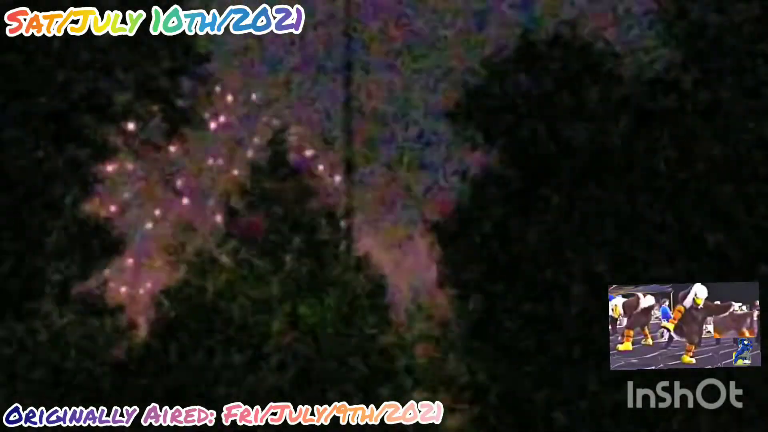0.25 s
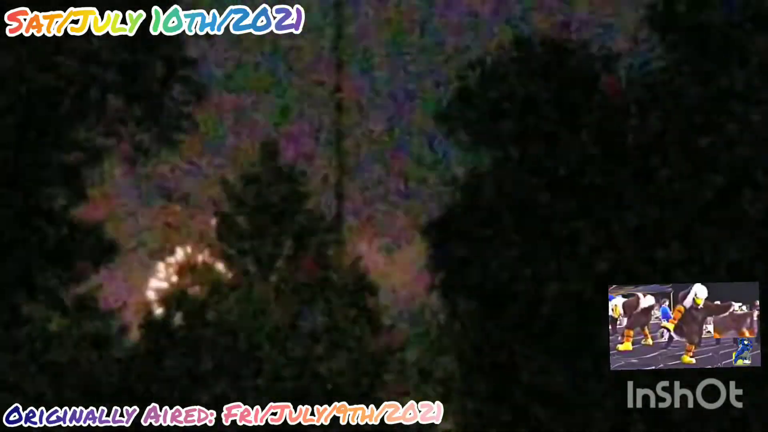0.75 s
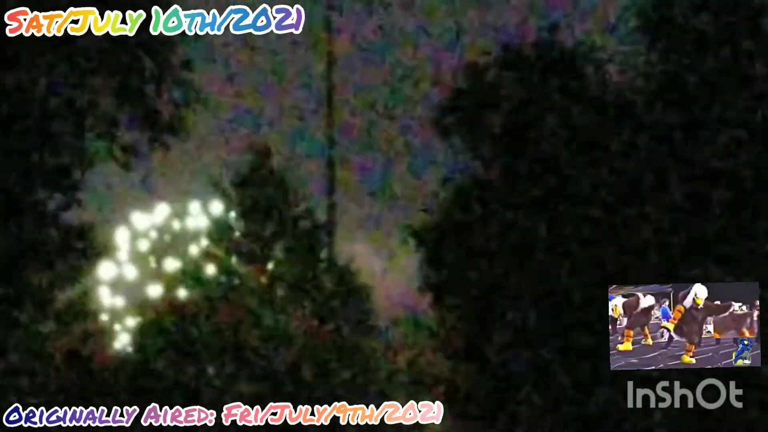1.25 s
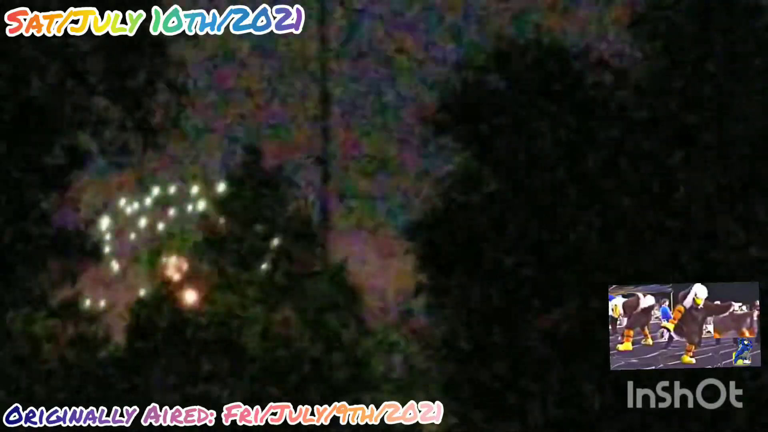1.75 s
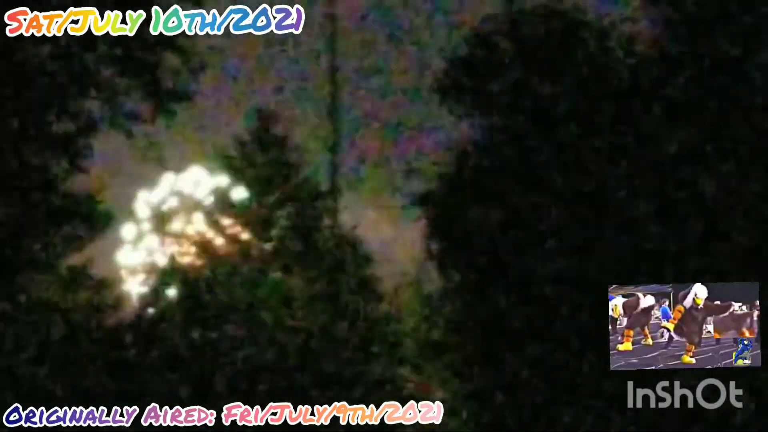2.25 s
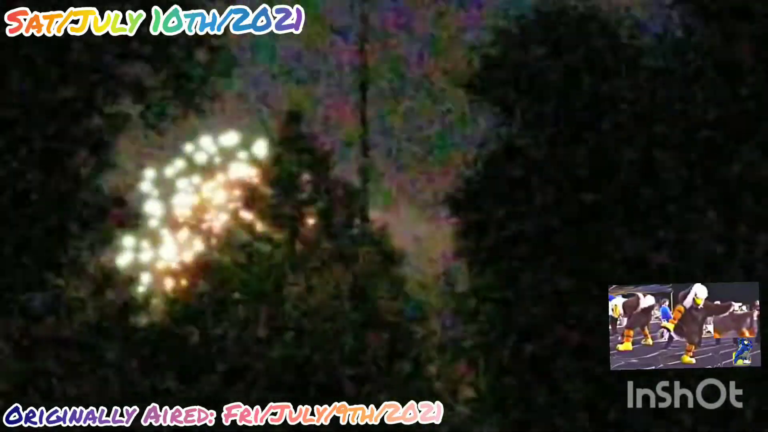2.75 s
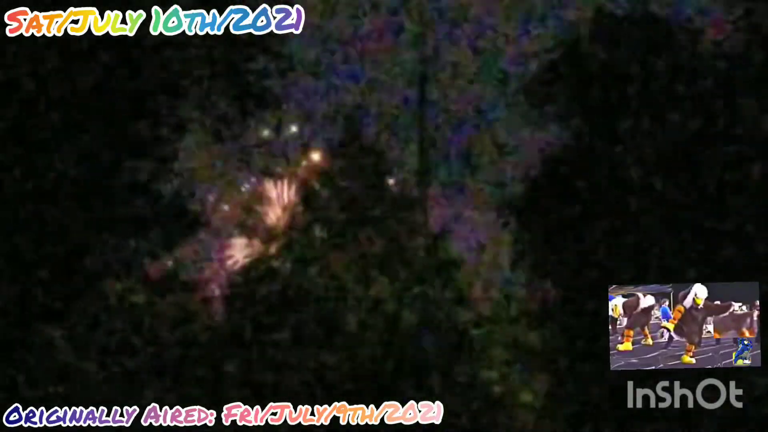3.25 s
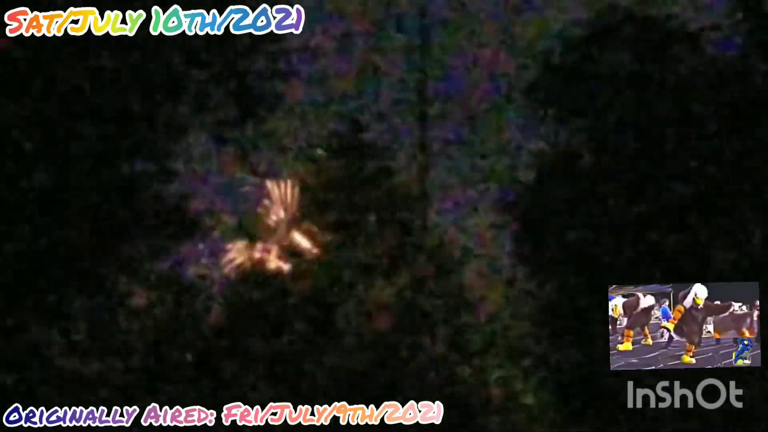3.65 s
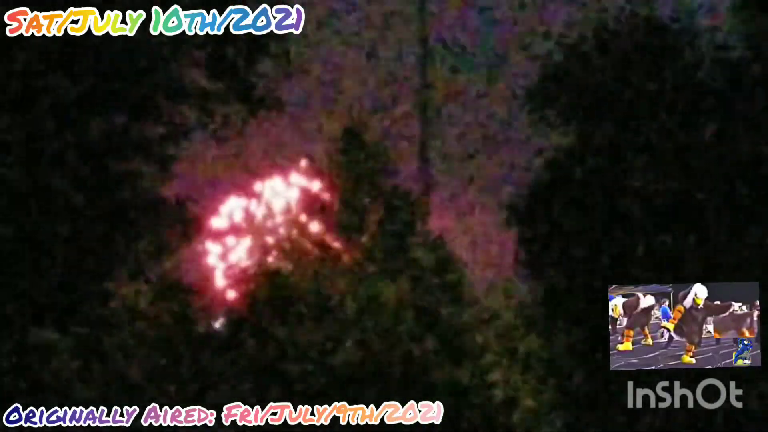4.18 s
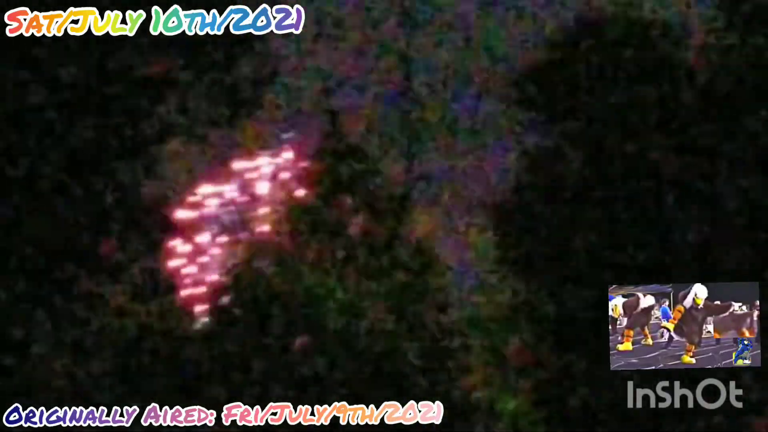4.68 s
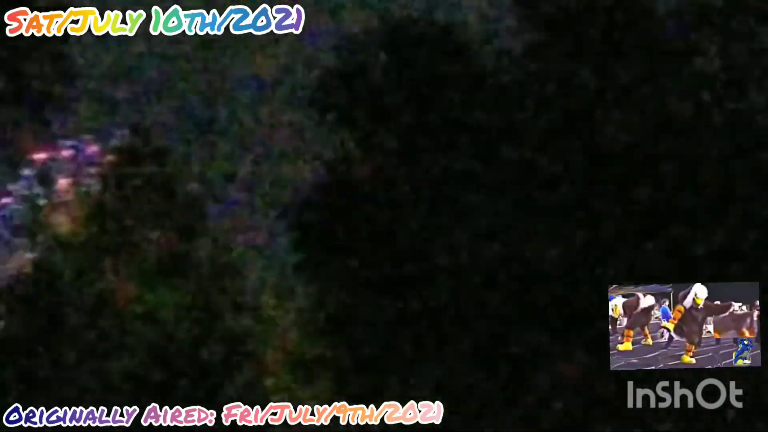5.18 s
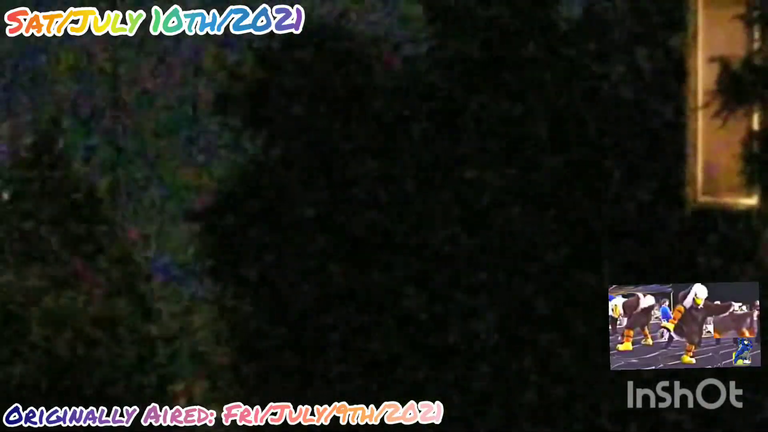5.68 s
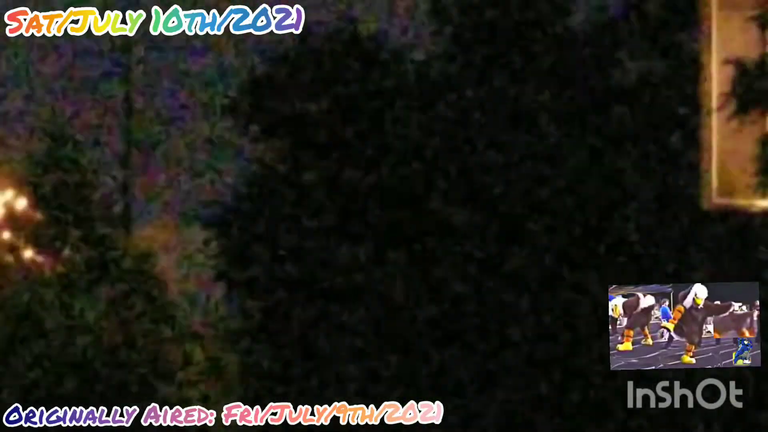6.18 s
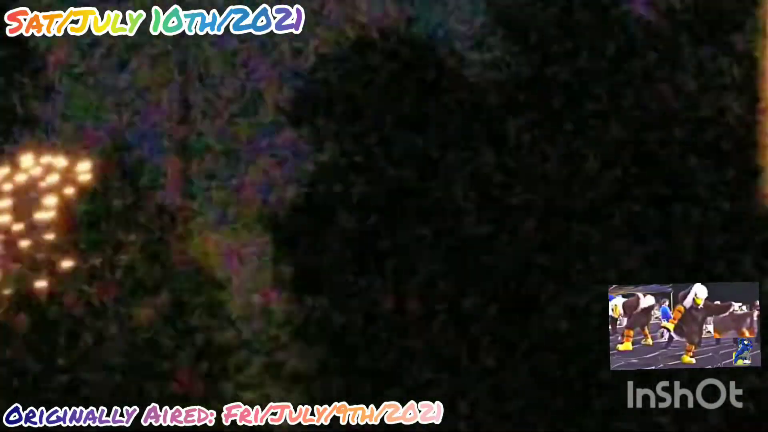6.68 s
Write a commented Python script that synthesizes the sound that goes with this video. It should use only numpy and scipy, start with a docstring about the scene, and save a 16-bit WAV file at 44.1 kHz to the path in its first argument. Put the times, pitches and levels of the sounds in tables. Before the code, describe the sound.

Distant fireworks thud dully in irregular clusters, each with a faint crack and rolling echo, over a far engine hum and soft hiss.

```python
"""Fireworks burst far away, heard from a garden beside a house: dull damped thumps with a faint crack on the
front. Each arrives three times within 20 ms (direct, then two echoes); single and diffuse echoes roll away. A
distant engine, built from wavering sines, hums up and coasts down, then whines in overtones. Filtered noise
makes the fading rumble and faint wash of the town and the hiss of the microphones."""
import sys
import numpy as np
from scipy import signal
from scipy.fft import rfft, irfft
from scipy.io import wavfile

SR = 44100
rng = np.random.default_rng(int(sys.argv[2]) if len(sys.argv) > 2 else 0)


def master(y):
    """Save y as 16-bit WAV."""
    cut = np.clip(np.atleast_2d(y).T, -1, 1)
    pcm = np.round(cut * 32767)  # scale
    wavfile.write(sys.argv[1], SR, pcm.astype(np.int16))


N = 305613
TIME = np.arange(N) / SR


def from_db(db):
    """Decibels to gain."""
    return 10 ** (np.asarray(db) / 20)


def rms_one(x):
    """Scale to rms 1."""
    return x / np.sqrt(np.mean(x ** 2) + 1e-20)


def in_time(rows):
    """Each column of a curve at every sample, linear between rows."""
    s, *columns = np.transpose(rows)
    return [np.interp(TIME, s, c) for c in columns]


def at_hz(points, hz):
    """Read a spectrum on a log-frequency axis."""
    f, value = np.transpose(points)
    return np.interp(np.log(hz + 1), np.log(f), value)


def butter(x, hz, kind, order):
    """Causal low- or high-pass."""
    return signal.sosfilt(signal.butter(order, min(hz, .45 * SR), kind, fs=SR, output="sos"), x)


def colour(x, spectrum):
    """Causal filter with the given spectrum: folding the cepstrum makes it minimum-phase."""
    size = 8192
    hz = np.fft.rfftfreq(size, 1 / SR)
    cepstrum = irfft(np.log(from_db(at_hz(spectrum, hz))))
    cepstrum[1:size // 2] *= 2
    cepstrum[size // 2 + 1:] = 0
    response = irfft(np.exp(rfft(cepstrum)))
    return signal.fftconvolve(x, response[None], axes=1)[:, :x.shape[1]]


def drift(rate_hz):
    """Slow chance: random knots of spread 1, joined by straight lines."""
    knots = rng.standard_normal(int(N / SR * rate_hz) + 2)
    return np.interp(TIME * rate_hz, np.arange(len(knots)), knots)


def diffuse(spectrum, size):
    """Stereo noise from all around: alike in the bass, opposed near 1 kHz, unrelated in the treble."""
    # left-right correlation of diffuse sound: f/Hz, correlation/-1..1
    likeness = [(30, 1), (125, 0.93), (250, 0.87), (500, .5), (1000, -0.74), (2000, 0.018), (4000, 0.),
                (16000, -0.063)]
    hz = np.fft.rfftfreq(size, 1 / SR)
    mid, side = rfft(rng.standard_normal((2, size)))
    alike = np.clip(at_hz(likeness, hz), -1, 1)
    both = np.sqrt(1 + alike) * mid + np.sqrt(1 - alike) * side * [[1], [-1]]
    return irfft(both * from_db(at_hz(spectrum, hz)), size)


def from_left(x, lag_s):
    """Sound from the left reaches the right microphone later and 1 dB weaker."""
    left, right = np.broadcast_to(x, (2, N))
    lagged = np.interp(TIME - lag_s, TIME, right)
    return np.array([left, lagged]) * from_db([[.5], [-.5]])


def add(track, sound, s):
    """Mix a sound in at a time."""
    start = int(np.clip(round(s * SR), 0, N - 1))
    track[..., start:start + sound.shape[-1]] += sound[..., :N - start]


def thump(hz, damping=0.6, front=0.98, low_cut_hz=48, reach=3.16):
    """Blast wave: push, suction and rebound, front rounded by distance, deepest part lost; peak 1."""
    turn = 2 * np.pi * hz * TIME[:SR // 6]
    wave = np.exp(-damping * turn) * (np.cos(turn) - damping * np.sin(turn))
    wave = butter(wave, front * hz, "low", order=1)
    wave = butter(wave, reach * hz, "low", order=6)  # bigger shells are duller
    wave = butter(wave, low_cut_hz, "high", order=4)
    return wave / np.abs(wave).max()


def crack(bright_db, scatter_db=-19, front_db=2.0, wide_db=-7, smear_s=.006):
    """Stereo shock front, frayed into a short spray by turbulence and trees, a little from the sides."""
    # shock front coloured by its long way through the air: f/Hz, relative level/dB
    air = [(150, -19.5), (280, -1), (370, 0.5), (480, 4), (600, 1), (850, -9.5), (1100, -7), (1450, -11.5),
           (1900, -26.5), (2600, -51), (7000, -62), (11000, -69)]
    tilt_low_hz, tilt_high_hz = 300, 1900  # bright_db is dB per octave between these
    t = TIME[:SR // 14]
    ahead, sides = rng.standard_normal((2, len(t)))
    spray = ahead + from_db(wide_db) * sides * [[1], [-1]]
    spray = from_db(scatter_db) * spray * np.exp(-t / smear_s)
    middle_hz = np.sqrt(tilt_low_hz * tilt_high_hz)
    tilted = []
    for hz, db in air:
        octaves = np.log2(np.clip(hz, tilt_low_hz, tilt_high_hz) / middle_hz)
        tilted.append((hz, db + bright_db * octaves))
    front = colour((t == 0)[None] * 1., tilted)
    frayed = from_db(front_db) * front + colour(spray, tilted)
    return frayed * (1 - t / t[-1]) / np.abs(front).max()


def bursts(rise_ms=1.84, cracks_db=5.5, crack_follows=0.93, second_dull_db=-2.5):
    """Thumps and cracks, each direct and twice echoed; the second echo weakens the crack further."""
    # shell bursts: t/s, thump level/dB, thump f/Hz, first echo delay/ms,
    # lean to first echo/dB, crack level before cracks_db/dB, crack brightness/(dB/octave)
    shells = [(0.336, -29, 123.3, 8.9, 4.5, -44, 1.5), (0.8729, -28, 110, 8.64, 2, -43, -0.5),
              (1.2585, -28.5, 120.3, 8.6, -3.5, -47.5, 0), (1.9778, -13, 82.5, 4.76, 0, -39, 0.5),
              (2.063, -16, 82.4, 6.2, -2, -38, 0), (2.1642, -15, 84, 3.65, -2.5, -40.5, -1.5),
              (2.2077, -21.5, 72.7, 6.25, -1.5, -45, 0.5), (2.8809, -18, 71.3, 8.77, 12, -39, 0),
              (3.2306, -20.5, 81.5, 6.1, -0.5, -44, 0), (3.5825, -19.5, 89.0, 5.33, -1.0, -44.5, -0.5),
              (4.751, -12.5, 66.6, 7.24, -6.5, -35.5, 1.5), (4.8293, -19.5, 69, 7.15, 7.5, -51.5, -0.5),
              (4.9807, -17.5, 62.2, 9.0, -1.5, -43, -1.5), (5.058, -14, 74.3, 7.0, -2.5, -43.5, 1),
              (5.2263, -23.5, 82.0, 7.37, 2.0, -51, -2), (6.1581, -14.5, 91, 4.16, -2, -43.5, 1),
              (6.1865, -13.5, 60.0, 8.3, 6.0, -48.5, 1.5), (6.442, -11, 68.5, 8.67, 5, -39.5, -1)]
    first_echo_db, second_wall_db = 1.0, 4  # at zero lean
    second_loses = .45  # share of the first echo's lean
    wall_gap_ms, gap_share = 4.1, .33  # second echo: fixed gap plus share of the first delay
    thumps, cracks = np.zeros(N), np.zeros((2, N))
    for s, thump_db, hz, echo_ms, lean_db, crack_db, bright_db in shells:
        body = from_db(thump_db) * thump(hz)
        direct = 0, 0, 0
        first = echo_ms, first_echo_db + lean_db, 0
        second_ms = echo_ms + wall_gap_ms + gap_share * echo_ms
        second = second_ms, second_wall_db - second_loses * lean_db, second_dull_db
        for delay_ms, echo_db, dull_db in (direct, first, second):
            # the thump starts rise_ms ahead of its crack
            add(thumps, from_db(echo_db) * body, s + (delay_ms - rise_ms) / 1000)
            arrival_db = crack_db + cracks_db + crack_follows * echo_db + dull_db
            add(cracks, from_db(arrival_db) * crack(bright_db), s + delay_ms / 1000)
    return thumps, cracks


def yard(x, boom_hz=68, width_hz=16, boom_db=-10.0):
    """The yard booms at one low pitch, and neighbouring houses answer with single echoes."""
    # house echoes: delay/s, level/dB
    houses = [(.05, -17), (.19, -23.5)]
    boom = signal.lfilter(*signal.iirpeak(boom_hz, boom_hz / width_hz, fs=SR), x)
    out = x + from_db(boom_db) * boom
    for delay_s, echo_db in houses:
        add(out, from_db(echo_db) * x, delay_s)
    return out


def neighbourhood(x, near_db=-50, near_t60_s=0.72, far_db=-58, far_t60_s=3.71, lumpy_db=4.0, gap_s=0.011):
    """Nearby houses scatter a quick echo; streets and woods farther off return a long uneven roll."""
    # colour of the rolling echoes: f/Hz, relative level/dB
    roll = [(30, -6), (50, 2.5), (70, 6), (100, -2), (160, -4), (280, 4.5), (500, 1.5), (1200, 0),
            (3000, -13)]
    size = 2 * SR
    t = TIME[:size]
    near = from_db(near_db - 60 * t / near_t60_s)
    far = from_db(far_db - 60 * t / far_t60_s)
    clumps = rms_one(from_db(lumpy_db * drift(70)[:size]))  # uneven returns from houses and groves
    onset = np.clip(t / gap_s - 1, 0, 1)
    response = diffuse(roll, size) * np.hypot(near, far) * clumps * onset
    return signal.fftconvolve(x[None], response, axes=1)[:, :N]


def engine_tone(start_s, end_s, hz, multiple, level_db, flutter_db, waver=0.0025, fade_s=0.085):
    """One order of the far engine, fluttering in level and pitch with the air on its way."""
    inside = np.clip(np.minimum(TIME - start_s + fade_s, end_s - TIME) / fade_s, 0, 1)
    phase = 2 * np.pi * multiple * np.cumsum(hz * (1 + waver * drift(45))) / SR
    level = from_db(level_db + flutter_db * drift(22))
    return np.sqrt(2) * inside * level * np.sin(phase)


def engine(whine_db=-2.5):
    """A low exhaust hum climbs under load and coasts down; the next pull carries only as overtones."""
    # climb: t/s, firing f/Hz, level/dB
    climb = [(0.05, 143.2, -39.5), (0.318, 145.7, -40), (0.38, 148.4, -41.5), (0.896, 152.6, -38),
             (1.404, 166.1, -39.5), (1.75, 169.0, -43)]
    # second pull: t/s, firing f/Hz, mean overtone level before whine_db/dB, brightness/(dB/order)
    pull = [(2.35, 162, -70.5, -2), (3.099, 162.1, -67.5, -0.5), (3.55, 165.6, -62, 1.5),
            (3.921, 170, -65.5, 0.5), (4.28, 160.9, -62.5, -7), (4.449, 162, -69, 3)]
    # multiples of the firing f
    overtones = (3, 4, 5)
    sag_hz_per_s, coast_fade_db_per_s, coast_end_s = 45, 4.5, 2.85
    hz, level_db = in_time(climb)
    coasting_s = np.maximum(TIME - climb[-1][0], 0)
    hz = hz - sag_hz_per_s * coasting_s
    level_db = level_db - coast_fade_db_per_s * coasting_s
    out = engine_tone(0, coast_end_s, hz, 1, level_db, flutter_db=1.7)
    hz, level_db, bright_db = in_time(pull)
    for multiple in overtones:
        overtone_db = level_db + whine_db + bright_db * (multiple - np.mean(overtones))
        out = out + engine_tone(pull[0][0], pull[-1][0], hz, multiple, overtone_db,
                                flutter_db=3.5, waver=0.00711)
    return out


def background(town_db=8.0, hiss_db=5.5, hiss_left_db=1.5):
    """Shaped noise: dying low rumble and wash of the town, and microphone hiss, stronger on the left."""
    # t/s, wash level before town_db/dB, hiss level before hiss_db/dB
    levels = [(0.0, -63, -77.5), (1.43, -60.5, -75), (3.59, -62, -79.5), (4.3, -64, -79), (6.93, -68, -80)]
    # rumble spectrum before rms scaling: f/Hz, density/(dB per Hz)
    rumble_spectrum = [(20, -43.5), (32, -26.5), (46, 1.5), (68, 0.5), (90, -3.5), (130, -1), (200, -9),
                       (320, -30), (600, -62.5)]
    # wash spectrum before rms scaling: f/Hz, density/(dB per Hz)
    town_spectrum = [(120, -13.5), (250, 0), (380, -4.5), (475, -7.5), (560, -8), (800, -2), (1300, -10.5),
                     (2050, -25.5), (2600, -37), (4000, -64)]
    # hiss spectrum before rms scaling: f/Hz, density/(dB per Hz)
    hiss_spectrum = [(1500, 2), (3500, -0.5), (6000, -7), (8800, -24), (9900, -6.5), (10700, 3.5),
                     (12300, 7), (14500, 6), (15800, 7)]
    rumble_db, rumble_fade_db_per_s = -45, 0.96
    wash_db, top_db = in_time(levels)
    rumble = from_db(rumble_db - rumble_fade_db_per_s * TIME) * rms_one(diffuse(rumble_spectrum, N))
    town = from_db(wash_db + town_db + 0.58 * drift(15.0)) * rms_one(diffuse(town_spectrum, N))
    hiss = from_db(top_db + hiss_db) * rms_one(diffuse(hiss_spectrum, N))
    return rumble + town + hiss * from_db([[hiss_left_db], [-hiss_left_db]])


def scene(thump_lag_s=0.00011, crack_lag_s=.00027):
    """Bursts and engine from the left, echoes and town all around; the bass sits nearer the middle."""
    thumps, cracks = bursts()
    low = from_left(yard(thumps) + engine(), thump_lag_s)
    sharp = from_left(yard(cracks), crack_lag_s)
    return low + sharp + neighbourhood(thumps + cracks[0]) + background()


def record(dry, cutoff_hz=15800):
    """The recorder cuts the very top with a steep elliptic low-pass."""
    return signal.sosfilt(signal.ellip(12, .1, 80, cutoff_hz, fs=SR, output="sos"), dry)


dry = scene()
out = record(dry)
master(out)
```